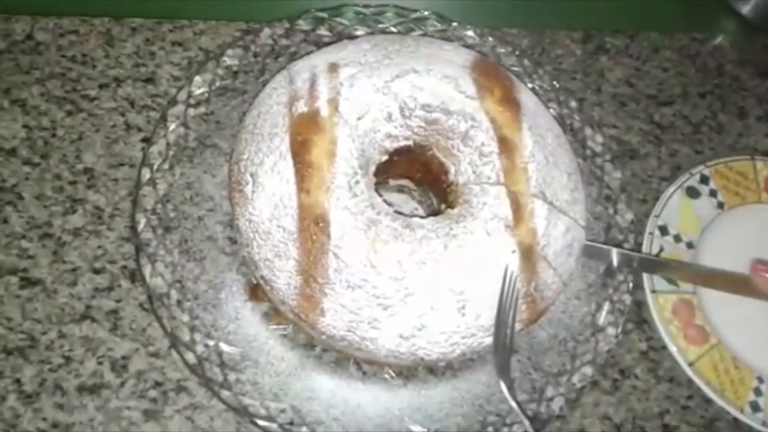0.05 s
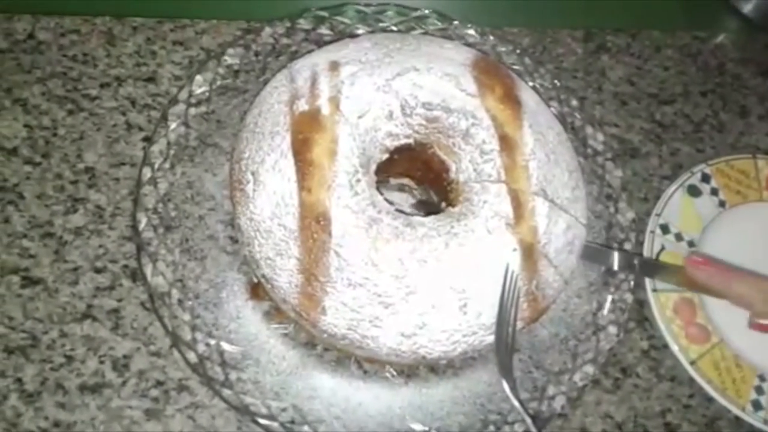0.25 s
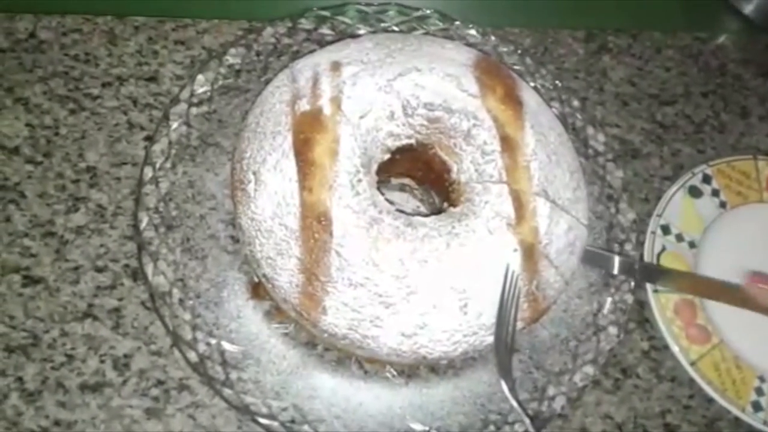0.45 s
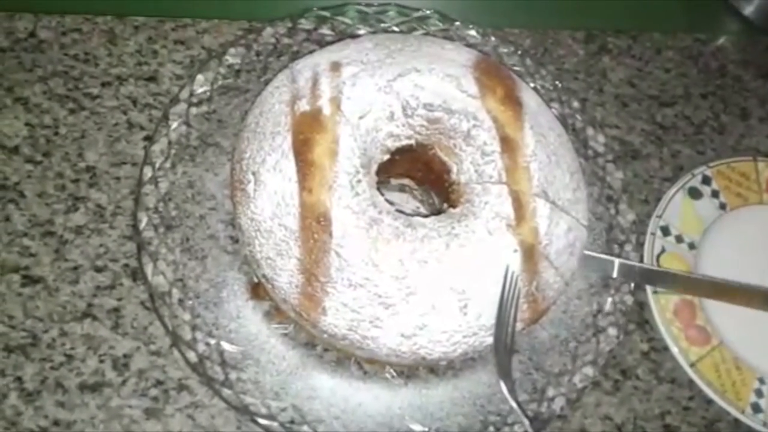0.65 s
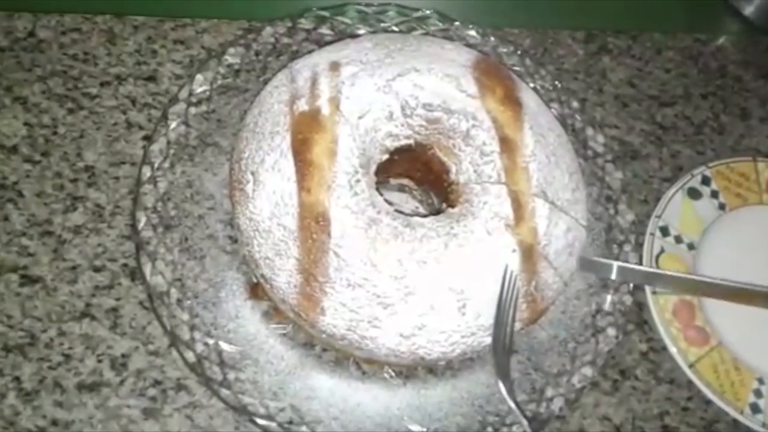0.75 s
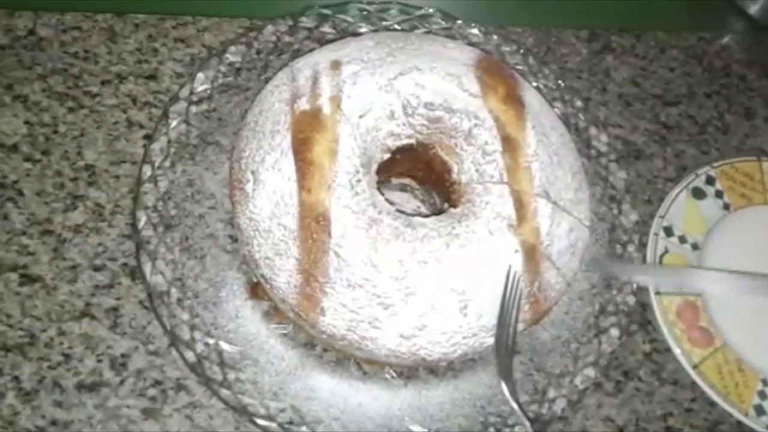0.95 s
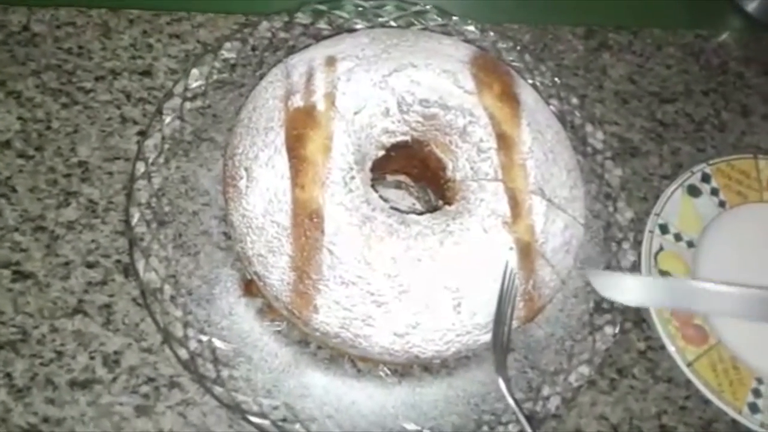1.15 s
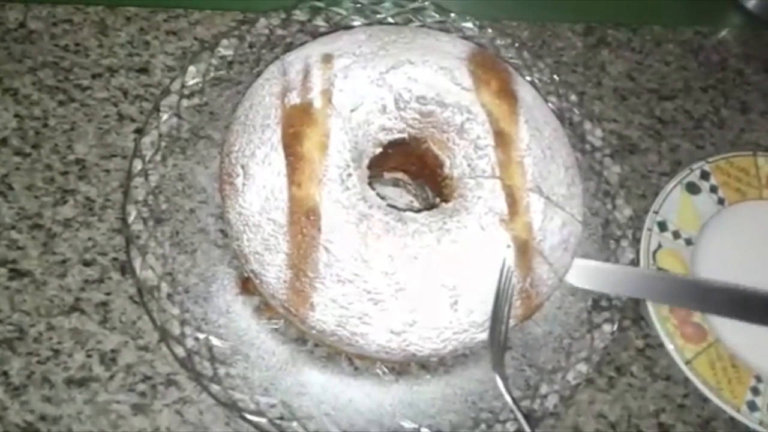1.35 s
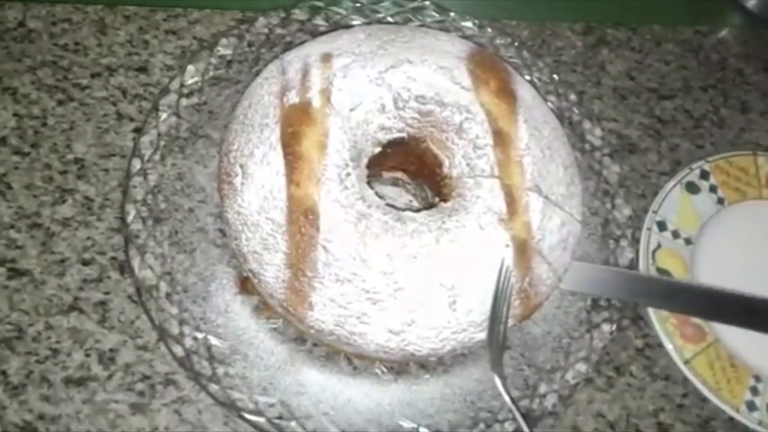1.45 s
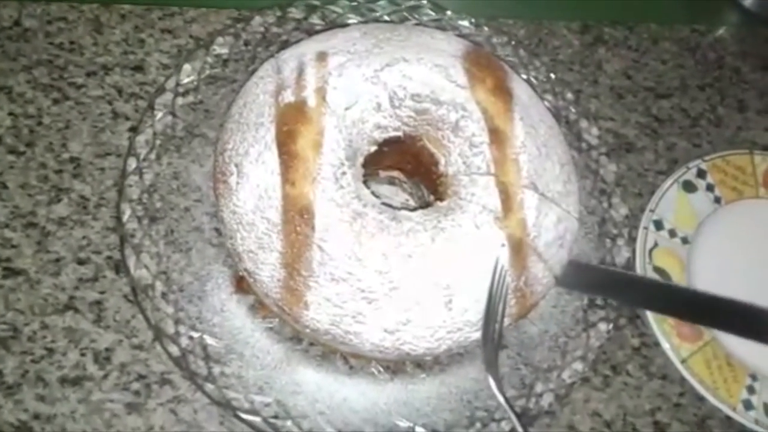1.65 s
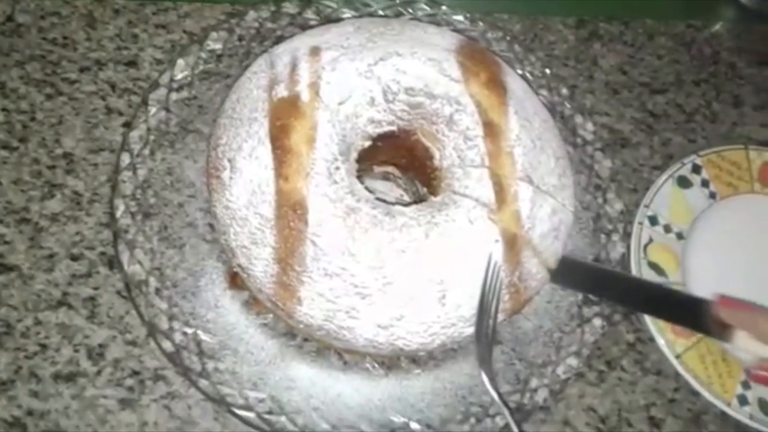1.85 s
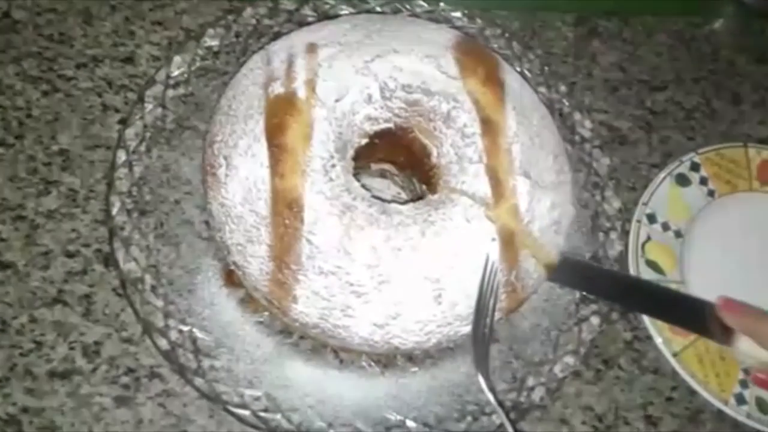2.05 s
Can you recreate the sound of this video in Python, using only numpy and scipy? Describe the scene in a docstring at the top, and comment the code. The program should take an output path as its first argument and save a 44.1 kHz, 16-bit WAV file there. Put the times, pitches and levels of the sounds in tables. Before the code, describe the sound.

A metal knife clinks sharply on a glass cake plate at about 0.2 seconds, as an earlier clink fades, and rings briefly in a hard-walled kitchen. The blade drags faintly over the glass until 0.9 seconds, with a tiny tick near 0.8. Brighter ticks come at 1.3 to 1.4 seconds, then weaker dragging and faint brushes until about 2. Low appliance hum, a thin whine and microphone hiss continue throughout.

```python
"""An earlier clink is dying away in a hard-walled kitchen, over appliance hum, a thin whine and
microphone hiss that last throughout. At 0.23 s a knife strikes a cut-glass cake plate: the contact
cracks, the plate rings in its modes and the walls reverberate. The blade drags over the glass in tiny
slips and ticks at 0.76 s. More ticks come near 1.3-1.4 s, then weaker dragging and faint brushes."""
import sys
import numpy as np
from scipy import signal
from scipy.fft import rfft, irfft
from scipy.io import wavfile
from scipy.ndimage import uniform_filter1d

SR = 44100
rng = np.random.default_rng(int(sys.argv[2]) if len(sys.argv) > 2 else 0)


def master(y):
    """Save y as 16-bit WAV."""
    cut = np.clip(np.atleast_2d(y).T, -1, 1)
    pcm = np.round(cut * 32767)  # scale
    wavfile.write(sys.argv[1], SR, pcm.astype(np.int16))


N = 92610
LEAD = 13230  # samples sounded before time zero


def amp(db):
    return 10 ** (np.asarray(db) / 20)


def unit_rms(x):
    return x / np.sqrt(np.mean(x ** 2) + 1e-20)


def over_frequency(points, hz):
    f, value = np.transpose(points)
    return np.interp(np.log(hz + 1), np.log(f + 1), value)


def over_time(points):
    s, value = np.transpose(points)
    return np.interp(np.arange(N) / SR, s, value)


def add(mix, at, sound):
    part = mix[at:][:len(sound)]
    part += sound[:len(part)]


def coloured(x, spectrum):
    """Spectral shaping by a curve in dB, scaled to unit RMS."""
    gain = amp(over_frequency(spectrum, np.fft.rfftfreq(len(x), 1 / SR)))
    return unit_rms(irfft(rfft(x) * gain, len(x)))


def resonate(x, hz, width):
    """Forced response of a damped resonator with unit peak gain."""
    phasor = np.exp(2j * np.pi * hz * np.arange(len(x)) / SR)
    pole = np.exp(-np.pi * width / SR)
    return 2 * (phasor * signal.lfilter([1 - pole], [1, -pole], x / phasor)).real


def ring(modes, t):
    """Free vibration after a blow: damped modes, neighbours in opposite phase."""
    return sum((-1) ** k * amp(db - 60 * t / t60) * np.sin(2 * np.pi * hz * t)
               for k, (hz, db, t60) in enumerate(modes))


def clinks(rise_s=0.0001, crack_t60_s=0.007, low_cut_hz=270):
    """Impact excitation: each knife contact gives a broadband crack and rings the plate's modes."""
    # plate modes: f/Hz, and for each (level/dB, T60/s)
    mode_hz = [430, 755, 930, 1120, 1330, 1405, 1800, 2300, 2405, 2830, 3470, 3900, 4300, 4720, 4910, 5250,
               6215, 6500, 6612, 6765, 7150, 7900, 8300, 8580, 8875, 9085, 9460, 9585, 10025, 10300, 10550,
               11350, 11900, 12840, 14830]
    mode_decays = [(-30.5, 0.094), (-25, 0.027), (-20, 0.039), (-21.5, 0.023), (-22.5, 0.048),
                   (-26.5, 0.071), (-31.5, 0.033), (-17.5, 0.12), (-16.5, 0.046), (-25, 0.029),
                   (-16.5, 0.017), (-16, 0.018), (-22.5, 0.027), (-18.5, 0.031), (-10, 0.014),
                   (-17.5, 0.0095), (-14.5, 0.019), (-16.5, 0.051), (-21, 0.054), (-18, 0.048),
                   (-17.5, 0.019), (-10, 0.012), (-19, 0.03), (-14, 0.038), (-12.5, 0.038), (-9.5, 0.016),
                   (-11, 0.016), (-12.5, 0.056), (-7.5, 0.027), (-16, 0.03), (-18, .015), (-22.5, 0.022),
                   (-25, .018), (-21, 0.023), (-25.5, .025)]
    # contacts: t/s, and for each (ring level/dB, crack level/dB)
    onsets = [-.2, .2288, .2295, .2316]
    contacts = [(-12.5, -24), (-7.5, -20), (-22, -17), (-19, -16)]
    # crack spectrum: f/Hz, relative level/dB
    crack_spectrum = [(400, -14), (950, 5.5), (1950, -27), (4700, 11), (5800, -21.5), (9800, 3),
                      (11000, -6.5), (16000, -38)]
    out, t = np.zeros(N + LEAD), np.arange(SR // 2) / SR
    plate = ring([(hz, *mode) for hz, mode in zip(mode_hz, mode_decays)], t)
    rise = np.minimum(t / rise_s, 1)
    for s, (ring_db, crack_db) in zip(onsets, contacts):
        noise = coloured(rng.standard_normal(len(t)), crack_spectrum)
        crack = noise * amp(crack_db - 60 * t / crack_t60_s)
        add(out, LEAD + round(s * SR), (amp(ring_db) * plate + crack) * rise)
    return signal.sosfilt(signal.butter(4, low_cut_hz, "high", fs=SR, output="sos"), out)


def reverberation(x, build_up_s=0.0047):
    """Diffuse reflection: wall echoes of random sign, each band decaying at its own rate."""
    # reverberation time of the kitchen: f/Hz, T60/s
    decay_times = [(300, 0.83), (1000, 0.92), (3000, 0.95), (6500, 0.8), (10000, .52), (15000, 0.34)]
    echoes, slots = np.zeros(SR), np.arange(0, SR - 10, 10)
    echoes[slots + rng.integers(0, 10, len(slots))] = rng.choice([-1., 1.], len(slots))
    hz, t, bands = signal.stft(echoes, SR, nperseg=256)
    decay = amp(-60 * t / over_frequency(decay_times, hz)[:, None])
    tail = signal.istft(bands * decay, SR, nperseg=256)[1]
    tail *= np.minimum(np.arange(len(tail)) / SR / build_up_s, 1)
    return signal.fftconvolve(x, tail / np.linalg.norm(tail))[:len(x)]


def hum_and_whine(whine_hz=5645.5):
    """Line spectra: random phase drift broadens each hum line; the whine is a pure tone."""
    # appliance hum: f/Hz, level/dB, linewidth/Hz
    hum_lines = [(60, -87, 3), (120, -77, 5), (181, -77, 6), (191, -74, 3), (240, -78, 7), (300, -76, 10)]
    # whine envelope: t/s, level/dB
    whine_levels = [(.0, -73), (.8, -72), (1.1, -71.5), (2.1, -70)]
    hum, t = np.zeros(N), np.arange(N) / SR
    for hz, db, width in hum_lines:
        drift = np.cumsum(rng.standard_normal(N)) * np.sqrt(2 * np.pi * width / SR)
        hum += amp(db) * np.sin(2 * np.pi * hz * t + drift)
    whine = amp(over_time(whine_levels)) * np.sin(2 * np.pi * whine_hz * t)
    return np.sqrt(2) * (hum + whine)


def noise_floor(tilt, base_db=-54.5, top_hz=15800, patch_db=.7, swell_db=.25):
    """Amplitude-modulated noise: the level wavers slightly, in spectral patches and as a whole."""
    # microphone hiss and appliance noise: f/Hz, relative level/dB
    spectrum = [(30, -64), (90, -9.5), (250, -0.5), (700, -5), (1200, -6), (2500, -11), (4200, -16.5),
                (5560, -13), (7000, -9.5), (9990, -1), (11500, -12.5), (13000, -18), (15600, -16)]
    frames, hz = N // 256 + 5, np.fft.rfftfreq(1024, 1 / SR)
    real, imag, patches = rng.standard_normal((frames, 513, 3)).T
    patches = unit_rms(uniform_filter1d(uniform_filter1d(patches, 10, 0), 10, 1))
    swell = unit_rms(uniform_filter1d(rng.standard_normal(frames), 12))
    band_db = over_frequency(spectrum, hz)
    gain = amp(band_db - band_db.max()) * (hz < top_hz)
    bands = (real + 1j * imag) * (gain * amp(over_frequency(tilt, hz)))[:, None]
    bands *= amp(patch_db * patches + swell_db * swell)
    return amp(base_db) * signal.istft(bands, nperseg=1024, noverlap=768)[1][:N] / np.linalg.norm(gain)


def drag(slips_per_s=7000, spread_db=2.5, hiss_db=3):
    """Stick-slip friction: dense, uneven slips of the blade hiss and drive the damped plate."""
    # drag envelope: t/s, level/dB
    envelope = [(0, -59.5), (.12, -69.5), (.3, -72.5), (.42, -64.5), (.54, -60), (.66, -61), (.74, -63.5),
                (.82, -62), (.88, -66), (.95, -79), (1.45, -80), (1.56, -68.5), (1.66, -74.5), (1.82, -67),
                (2.1, -75.5)]
    # damped plate resonances: f/Hz, bandwidth/Hz, relative level/dB
    resonances = [(740, 92, 6.5), (883.5, 9.2, 2.5), (1220, 54, -11), (2194, 280, -5.5), (3010, 28, -9),
                  (3960, 51, -10.5), (4360, 160, -7), (4600, 38, -4.5)]
    # friction hiss: f/Hz, relative level/dB
    hiss_spectrum = [(240, -22), (400, -1), (3060, -10.5), (3740, -12), (4350, -45), (5310, -20.5),
                     (8800, -8), (15500, -29)]
    strength = amp(spread_db * np.minimum(rng.exponential(1, N), 4))
    slips = strength * (rng.random(N) < slips_per_s / SR) * rng.choice([-1., 1.], N)
    plate = sum(amp(db) * unit_rms(resonate(slips, hz, width)) for hz, width, db in resonances)
    hiss = amp(hiss_db) * coloured(slips, hiss_spectrum)
    return amp(over_time(envelope)) * (unit_rms(plate) + hiss)


def brushes():
    """Light sliding friction: hand and blade make soft puffs of noise, each in one band."""
    # brushes: t/s, and for each (duration/s, f/Hz, bandwidth/Hz, level/dB)
    onsets = [.75, 1.335, 1.5, 1.53, 1.57, 2.0, 2.02]
    strokes = [(.13, 4200, 450, -67), (0.026, 9000, 1800, -57), (0.083, 12500, 5100, -62),
               (0.019, 4100, 600, -68), (0.044, 710, 190, -66.5), (0.037, 13500, 5000, -70),
               (0.081, 1110, 53, -62)]
    out = np.zeros(N)
    for s, (length, hz, width, db) in zip(onsets, strokes):
        band = resonate(resonate(rng.standard_normal(6000), hz, width), hz, width)
        puff = unit_rms(band[500:500 + round(length * SR)])
        add(out, round(s * SR), amp(db) * puff * np.sqrt(np.hanning(len(puff))))
    return out


def ticks(pivot_hz=9400, rise_s=0.00072, grit_db=-30, grit_t60_s=0.049):
    """Heavily damped vibration: the blade tip rings briefly with gritty noise, some ticks brighter."""
    # ticks: t/s, and for each (level/dB, tilt about the pivot/(dB per octave))
    onsets = [.7645, 1.3250, 1.3845, 1.3856, 1.399]
    taps = [(-38, 2), (-30, 2.5), (-27, 17), (-23.5, 8), (-41, 2)]
    # blade-tip modes: f/Hz, relative level/dB, T60/s
    tip_modes = [(1784, -20, 0.07), (3250, -9, 0.0068), (4250, -11, 0.017), (5100, -13, 0.0066),
                 (6720, 1, 0.0027), (9370, 0, 0.0089), (10280, -10, 0.0081), (12300, -20, 0.0073),
                 (14000, -16, 0.0056), (15300, -21, 0.0054)]
    out, t = np.zeros(N + LEAD), np.arange(2000) / SR
    rise = np.minimum(t / rise_s, 1)
    for s, (db, tilt) in zip(onsets, taps):
        modes = [(hz, mode_db + tilt * np.log2(hz / pivot_hz), t60) for hz, mode_db, t60 in tip_modes]
        grit = amp(grit_db - 60 * t / grit_t60_s) * rng.standard_normal(len(t))
        add(out, LEAD + round(s * SR), amp(db) * (ring(modes, t) + grit) * rise)
    return out


def scene(room_db=-7, tick_send_db=-4):
    """Superposition: only the impacts reverberate, and only the noise floor has stereo width."""
    # left-right difference of the noise floor: f/Hz, relative level/dB
    side_tilt = [(60, -10), (240, -19.5), (950, -26.5), (3770, -34.5), (15000, -55)]
    clink, tick = clinks(), ticks()
    echo = amp(room_db) * reverberation(clink + amp(tick_send_db) * tick)
    impacts = (clink + tick + echo)[LEAD:]
    mid = impacts + drag() + brushes() + hum_and_whine() + noise_floor(tilt=[(20, 0), (20000, 0)])
    side = noise_floor(side_tilt)
    return np.array([mid + side, mid - side])


def record(dry, cutoff_hz=16600, offset=-.0005):
    """Band limiting by a low-pass filter, then a small steady offset."""
    low_pass = signal.firwin(511, cutoff_hz, window=("kaiser", 9), fs=SR)
    return signal.oaconvolve(dry, low_pass[None], "same") + offset


dry = scene()
out = record(dry)
master(out)
```